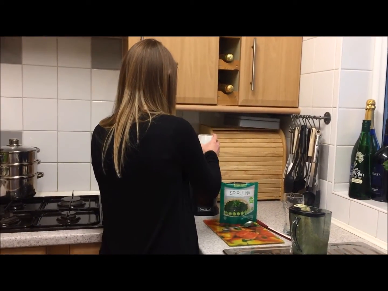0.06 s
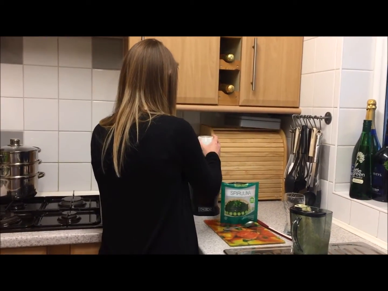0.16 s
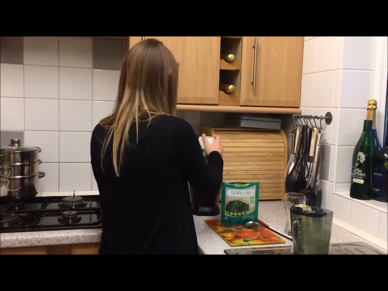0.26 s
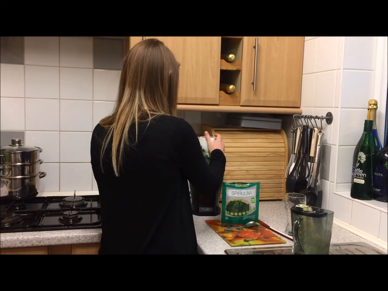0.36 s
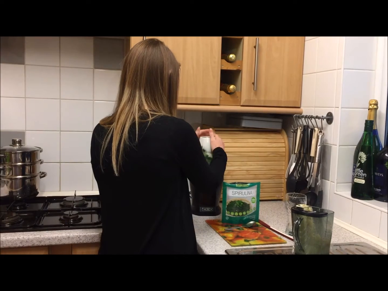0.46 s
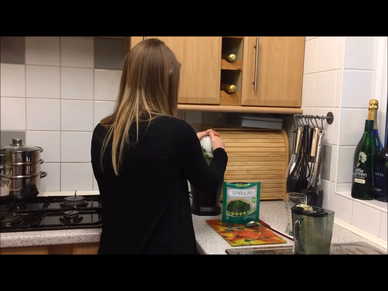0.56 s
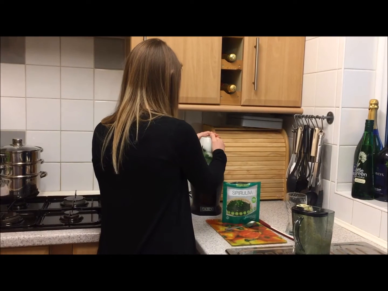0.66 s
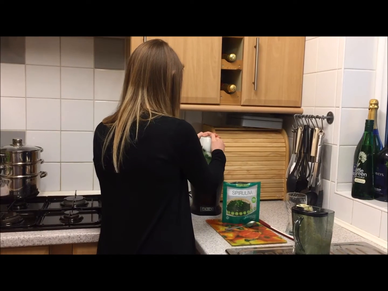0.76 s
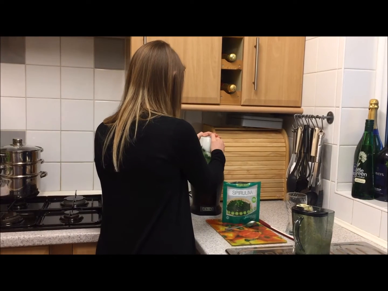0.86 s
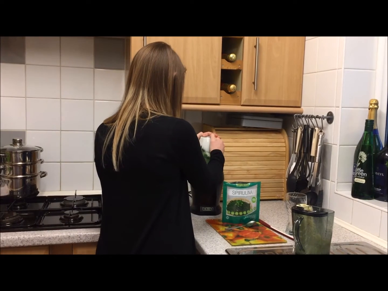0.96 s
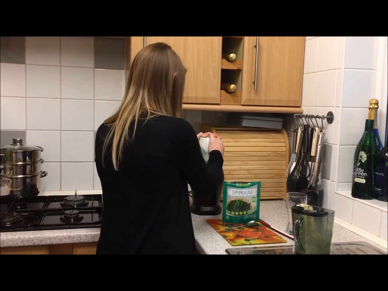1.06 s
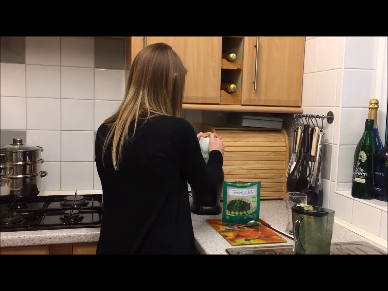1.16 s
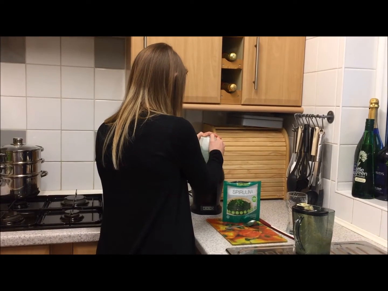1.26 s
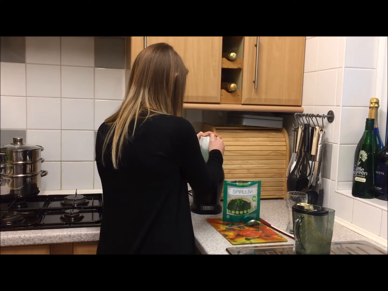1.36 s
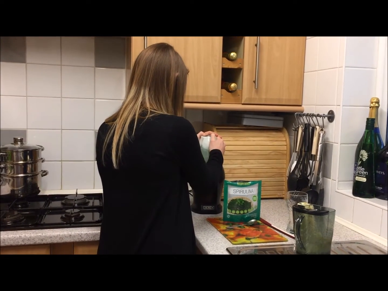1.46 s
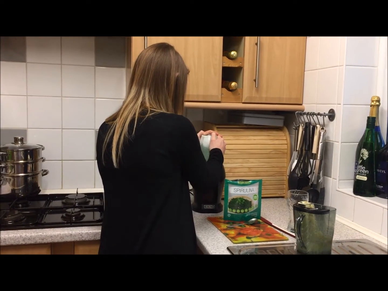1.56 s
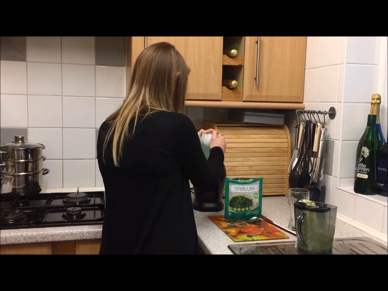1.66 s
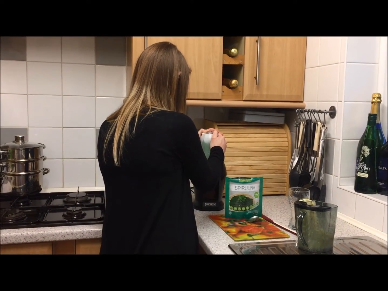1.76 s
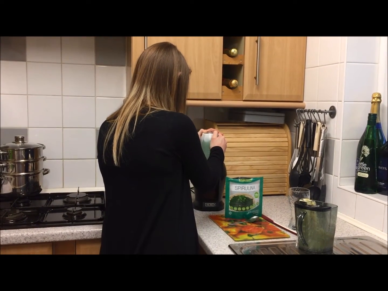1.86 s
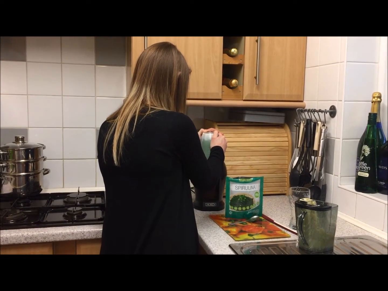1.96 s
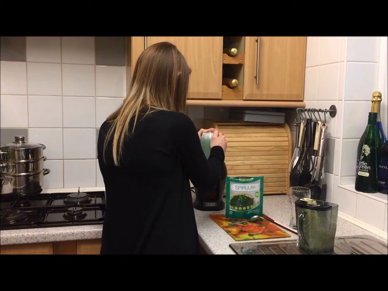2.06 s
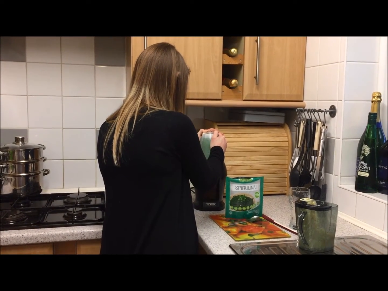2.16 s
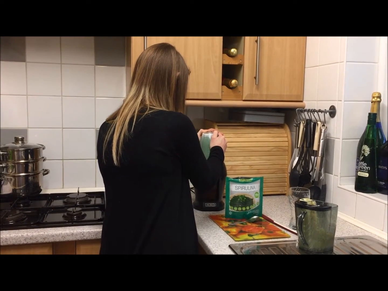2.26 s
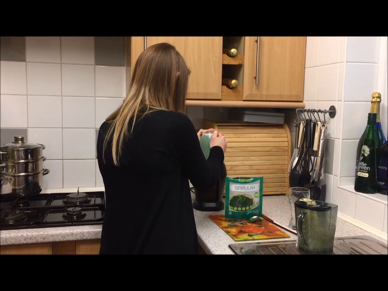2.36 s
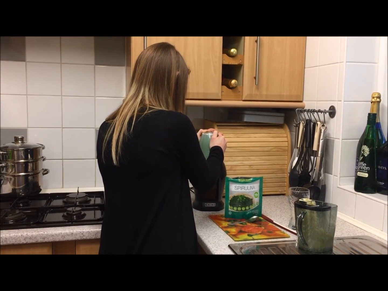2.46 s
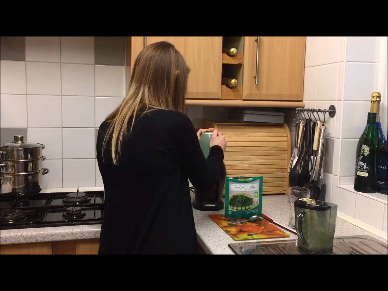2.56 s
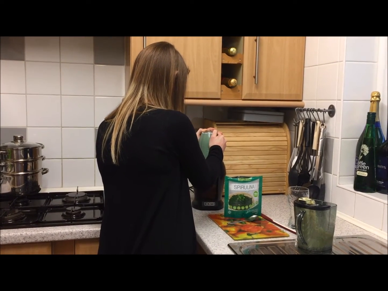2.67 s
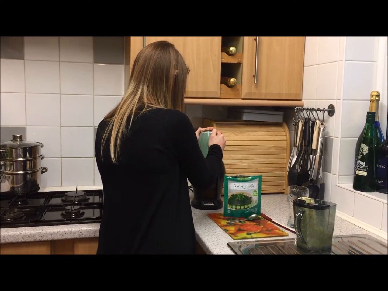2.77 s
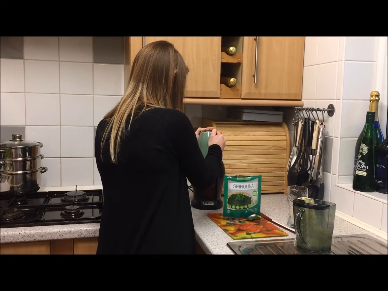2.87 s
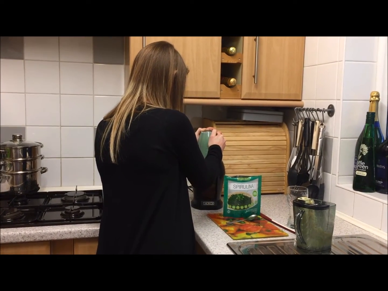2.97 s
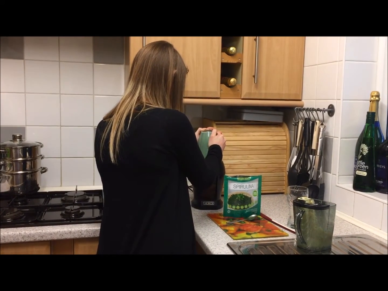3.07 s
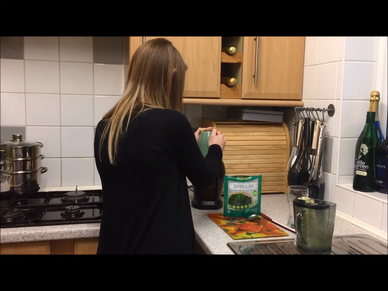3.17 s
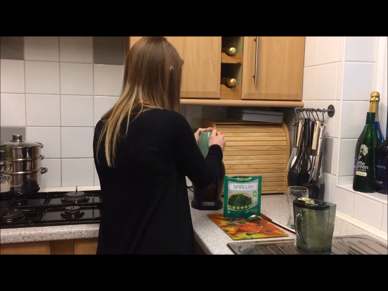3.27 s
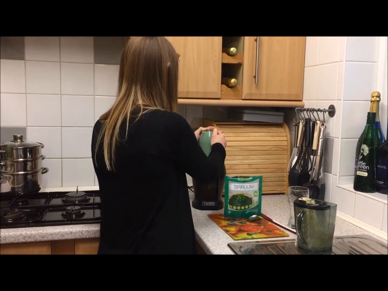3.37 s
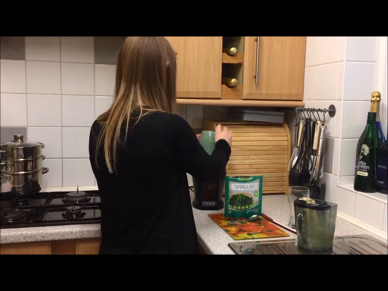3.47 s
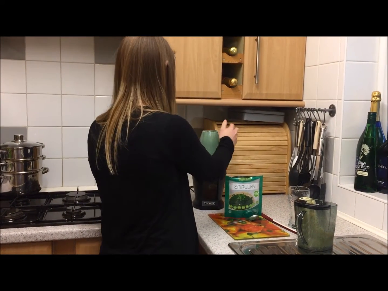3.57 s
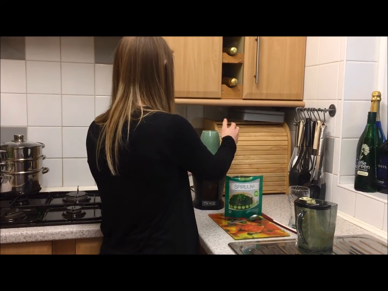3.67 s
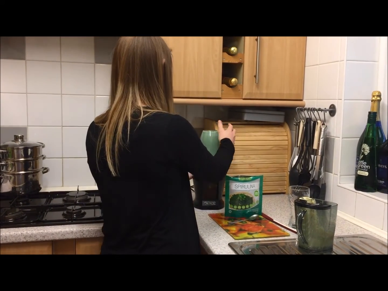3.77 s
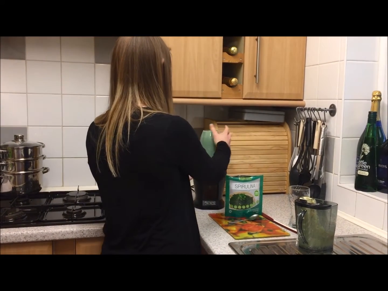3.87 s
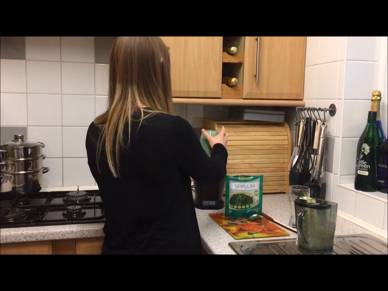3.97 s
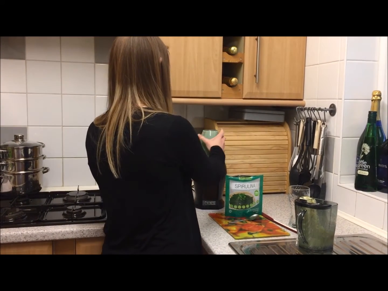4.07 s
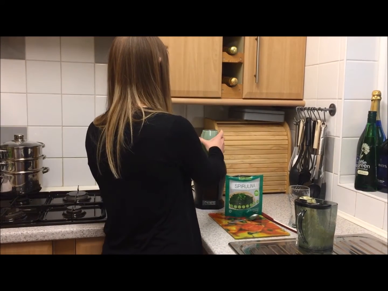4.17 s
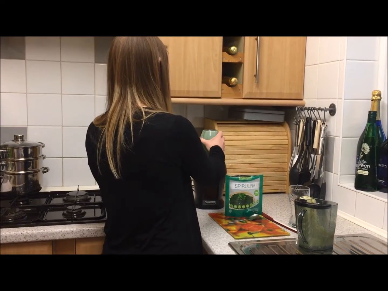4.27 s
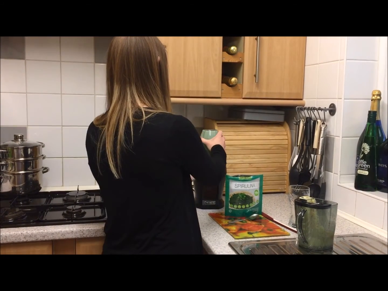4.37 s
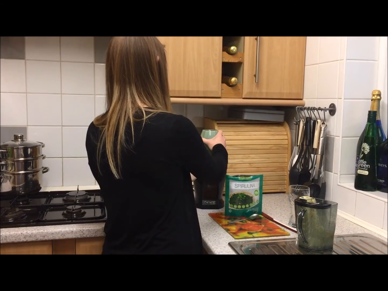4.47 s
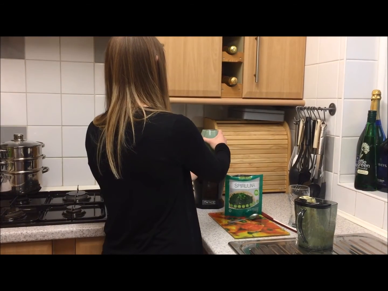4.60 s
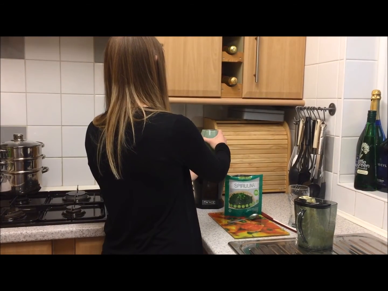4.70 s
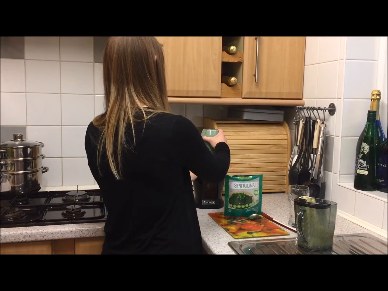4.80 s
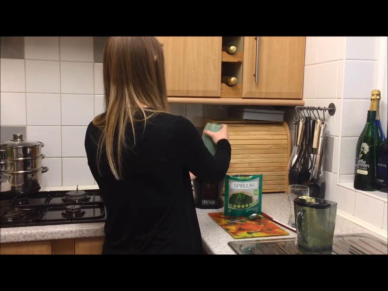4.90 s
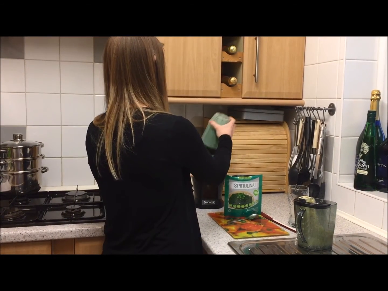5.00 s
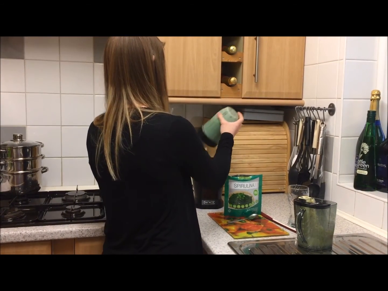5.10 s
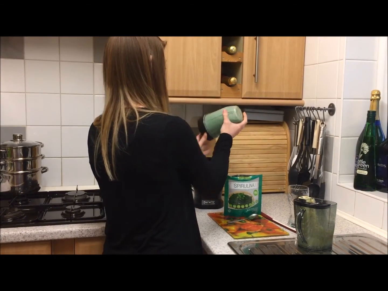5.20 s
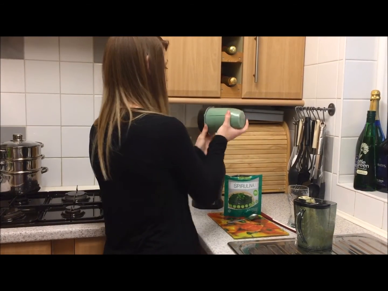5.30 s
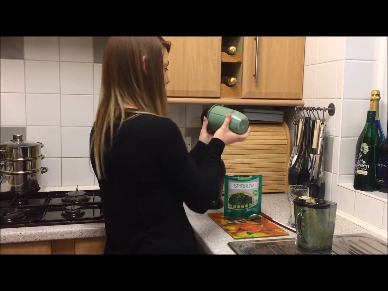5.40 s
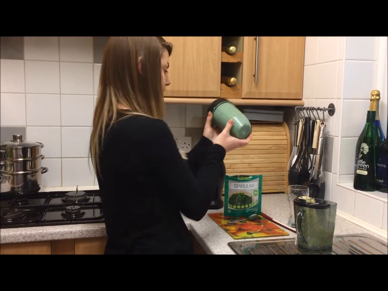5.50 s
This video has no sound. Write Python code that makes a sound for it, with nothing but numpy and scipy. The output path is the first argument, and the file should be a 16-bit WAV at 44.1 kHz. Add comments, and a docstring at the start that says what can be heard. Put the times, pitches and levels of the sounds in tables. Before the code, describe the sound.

In a tiled kitchen, a plastic cup knocks a few times onto a small blender base. With sharp clacks the motor starts, humming and churning liquid, then jumps to a high, hissing whine for about two seconds. It coasts down, the cup gives a faint squeak, and a hollow clack unlocks it, followed by light taps. The microphone stands some way back, so the room rings briefly.

```python
"""Personal blender in a tiled kitchen

One microphone, far enough back that the tiles outweigh the direct knocks. Over still air and appliance
hum the cup knocks onto its base, the motor hums and the blade churns liquid; it coasts down, and the cup
squeaks and is unlocked. The middle of the run passes four times too fast and too high, so the hum whines.
Cue times are as heard; decays, rates and frequencies are the kitchen's own unless marked as heard."""
import sys
import numpy as np
from scipy import signal
from scipy.fft import rfft, irfft, next_fast_len
from scipy.io import wavfile

SR = 44100
rng = np.random.default_rng(int(sys.argv[2]) if len(sys.argv) > 2 else 0)


def dump_mix(stems):
    """Bounce the given channels to the path in sys.argv[1] as a 16-bit WAV at rate SR."""
    frames = np.atleast_2d(stems).T  # one column per channel
    limited = np.clip(frames, -1, 1)  # hard clip at full scale
    pcm = np.round(limited * 32767).astype(np.int16)
    wavfile.write(sys.argv[1], SR, pcm)


N = 244342

FAST_FROM_S, FAST_TO_S, FAST = 1.57, 3.467, 4
ON_S, OFF_S = 1.107, 3.3334  # the motor's switch
DRAG_S = .2  # time constant of dragging the liquid up to speed
KITCHEN_N = N + round((FAST - 1) * (FAST_TO_S - FAST_FROM_S) * SR) + FAST  # samples before speeding up
CLOCK = np.arange(KITCHEN_N) / SR
FFT_N = next_fast_len(KITCHEN_N, True)
HZ = np.fft.rfftfreq(FFT_N, 1 / SR)

# A low boom near 56 Hz, then resonances of cup and base. Each row: centre in Hz, width in Hz, lift in dB.
PEAKS = [(56, 11, 11), (145, 53, 7.3), (276, 18, 15.5), (386, 17, 7.8), (548, 28, 6.2), (639, 59, 5.7),
         (741, 20, 6.7), (1016, 15, 2.4), (1102, 23, 6.9), (1207, 25, 6), (1288, 100, 7.3), (1340, 19, 7.3),
         (1610, 100, 6.5), (1730, 200, 3.2), (1850, 25, 6.9), (1950, 47, 6.2), (2141, 41, 9.9),
         (3144, 27, 8.9), (3775, 50, 8)]


def kitchen_time(s):
    """Seconds in the kitchen for a time as heard."""
    return s + (FAST - 1) * (np.clip(s, FAST_FROM_S, FAST_TO_S) - FAST_FROM_S)


def since(s, t):
    """Kitchen seconds gone by at t since the cue s; zero before it."""
    return np.maximum(t - kitchen_time(s), 0)


def amp(db):
    """Decibels to gain."""
    return 10 ** (np.asarray(db) / 20)


def unit_rms(x):
    """Scales to an rms of one."""
    return x / np.sqrt(np.mean(x ** 2) + 1e-20)


def curve(points, hz):
    """Joins (Hz, value) points on a log-frequency axis."""
    f, value = np.transpose(points)
    return np.interp(np.log(hz + 1), np.log(f + 1), value)


def lift(resonances, hz):
    """The gain of a set of resonances, in dB."""
    return sum(db / (1 + (2 * (hz - centre) / width) ** 2) for centre, width, db in resonances)


def follow(rows, t):
    """The columns of a cue table at kitchen times t."""
    s, *columns = np.transpose(rows)
    return [np.interp(t, kitchen_time(s), column) for column in columns]


def drift(t, per_s):
    """A random wander of about unit size, with per_s new values a second."""
    return np.interp(t * per_s, np.arange(12 * per_s), rng.standard_normal(12 * per_s))


def add(mix, start, sound):
    """Mixes a sound in at a kitchen time."""
    part = mix[max(round(start * SR), 0):][:len(sound)]
    part += sound[:len(part)]


def tiled_room(x, direct):
    """The direct sound and a dense tail off the tiles, each band dying at its own speed."""
    # The room's ring. Each row: frequency in Hz, seconds to fall 60 dB.
    ring_times = [(150, .38), (500, .32), (1100, .31), (2400, .32), (4000, .29), (6000, .28), (10000, .27),
                  (16000, .25)]
    hz, t, noise = signal.stft(rng.standard_normal(SR // 2), SR, nperseg=256)
    response = signal.istft(noise * amp(-60 * t / curve(ring_times, hz)[:, None]), SR, nperseg=256)[1]
    response /= np.linalg.norm(response)
    response[0] += direct
    return signal.fftconvolve(x, response)


def coloured_noise(colour):
    """Noise of unit rms, shaped by (Hz, dB) points."""
    spectrum = rfft(rng.standard_normal(FFT_N)) * amp(curve(colour, HZ))
    return unit_rms(irfft(spectrum)[:KITCHEN_N])


def room_tone(air_db=-67.5, waver_db=1.5):
    """Still air, wavering slightly in level, and the steady hum of appliances."""
    # The air's colour. Each row: frequency in Hz, relative level in dB.
    air_colour = [(25, -28.5), (66, -6.5), (113, -22), (173, -11.5), (240, -21), (330, -20), (460, -30.5),
                  (770, -23.5), (1000, -27), (1700, -28.5), (3000, -36), (5000, -41), (9000, -45.5),
                  (15500, -48)]
    # Appliance tones. Each row: frequency in Hz, level in dB.
    hum_tones = [(59.2, -76), (183, -79), (280, -80.5), (786, -75.5), (931, -86)]
    air = coloured_noise(air_colour) * amp(air_db - waver_db * drift(CLOCK, per_s=8))
    hum = sum(amp(db) * np.sin(2 * np.pi * (hz * CLOCK + rng.random())) for hz, db in hum_tones)
    return air + np.sqrt(2) * hum


def touch(s, clack_db, thud_db, tilt_db, contact_s, hollow, base_t60=.42, cup_t60=.13, rise_s=.0047):
    """A contact rings plastic and room over a low worktop thud: short ones knock, long ones rustle."""
    # The plastic's colour. Each row: frequency in Hz, relative level in dB.
    plastic_colour = [(30, -25), (100, -5), (250, -6), (450, -6.5), (800, -2.5), (1300, -1.5), (2000, -5),
                      (3400, -5.5), (4500, -9.5), (6000, -12), (9000, -20), (12000, -22), (15500, -24)]
    # The hollow cup ringing. Each row: frequency in Hz, lift in dB when fully hollow.
    hollow_colour = [(450, -1), (680, 5), (1300, 2), (1800, 12), (2600, 13), (3500, 9), (5000, 3.5),
                     (10000, 4)]
    # Modes of the base on the worktop. Each row: frequency in Hz, relative level in dB.
    worktop_modes = [(175, -10.5), (278, 4), (322, -1.5), (378, -5.5)]
    t = np.arange(SR * 3 // 5) / SR
    hz = np.fft.rfftfreq(len(t), 1 / SR)
    contact = rng.standard_normal(len(t)) * (t / contact_s) * np.exp(-2 * t / contact_s)
    spectrum = rfft(tiled_room(contact, direct=.11)[:len(t)])
    colour_db = curve(plastic_colour, hz) + .57 * lift(PEAKS, hz) + hollow * curve(hollow_colour, hz)
    colour_db += tilt_db * np.log2(np.maximum(hz, 400) / 2500)
    clack = irfft(spectrum * amp(colour_db), len(t))
    bass_db = curve([(30, -31.5), (65, -20), (110, -14.5), (180, 6), (340, 1), (520, -23.5),
                     (1200, -40), (4000, -79.5)], hz)
    bass_db += hollow * curve([(80, -14.5), (150, -1)], hz)  # the light cup has little deep bass
    boom = irfft(spectrum * amp(bass_db), len(t))
    ring = sum(amp(db) * np.sin(2 * np.pi * (f * t + rng.random())) for f, db in worktop_modes)
    t60 = np.interp(hollow, [0, 1], [base_t60, cup_t60])  # shorter when the cup takes the blow
    thud = ring * -np.expm1(-t / rise_s) * amp(-60 * t / t60)
    parts = ((clack, clack_db), (thud, thud_db), (boom, thud_db - 2))
    sound = sum(amp(db) * part / np.std(part[:SR // 25]) for part, db in parts)  # levels of first 40 ms
    fade_out = np.clip(3 - 4 * t / t[-1], 0, 1)
    return kitchen_time(s), sound * fade_out


def cabinet_rumble(rest_db=-81, rise_s=.026, fall_s=.039):
    """The cabinets are leaned on, or jolted as the motor starts and stops."""
    # Shoves that swell, hold and die away. Each row: start in seconds, hold in seconds, level in dB.
    shoves = [(.08, .27, -47), (.8, .04, -64.5), (1.19, .3, -52), (3.47, .47, -56.5), (5.098, .06, -63.5)]
    gain = amp(rest_db)
    for s, hold_s, db in shoves:
        swell = np.minimum(CLOCK - kitchen_time(s), 0) / rise_s
        gain += amp(db) * np.exp(swell - since(s + hold_s, CLOCK) / fall_s)
    return gain * coloured_noise([(20, -36), (52, -1.5), (80, 2.5), (110, -25.5), (300, -68)])


def shaft_speed(t, leap_s=.04, drag_share=.6, coast_s=.62, friction=.1):
    """Turns a second: the rotor leaps, drags the liquid up to speed, and coasts to rest."""
    # The whine at full power, sagging as the load grows. Each row: time in seconds, pitch as heard in Hz.
    whine = [(1.95, 1008), (2.324, 993.6), (2.484, 981), (2.824, 964.3), (3.252, 961.7), (3.31, 952.4)]
    on, off = since(ON_S, t), since(OFF_S, t)
    run_up = 1 - (1 - drag_share) * np.exp(-on / leap_s) - drag_share * np.exp(-on / DRAG_S)
    coast = (1 + friction) * np.exp(-off / coast_s) - friction  # liquid drag and dry friction
    return follow(whine, t)[0] / FAST * np.maximum(run_up * coast, 0)


def motor(shaft_db=-38, db_per_octave=15, growl_db=-32, flutter_db=3, ripple_hz=100, full_load_sag=.05):
    """Shaft orders, the twelve-bar commutator, and sidebands from the mains pulsing the torque."""
    # Motor tones. Each row: multiple of the shaft speed, sideband of the torque ripple,
    # relative level in dB, change under full load in dB.
    partials = [(2, 0, -45, -3.5), (3, 0, -39.5, -2), (4, 0, -45.5, 1), (5, 0, -44, -2), (6, 0, -50, 1.5),
                (8, 0, -41.5, 3.5), (9, 0, -48.5, 2), (12, 0, -35, -1.5), (13, 0, -43.5, 6),
                (15, 0, -45, -0.5), (1, 1, -45.5, -1.5), (2, -1, -42.5, 1.5), (2, 1, -41, -3),
                (3, 1, -54.5, 11), (4, 1, -46, -2.5), (5, 1, -44.5, 2), (7, 1, -49, 1.5)]
    # Housing resonances that the hum passes. Each row: centre in Hz, width in Hz, lift in dB.
    housing_modes = [(152, 14, 11), (175, 24, 11), (243, 12, 11.05)]
    t = CLOCK[shaft_speed(CLOCK) > 1]
    speed = shaft_speed(t)
    pace = speed / speed.max()
    turns = np.cumsum(speed * (1 + .001 * drift(t, per_s=20))) / SR  # lumps load the blade unevenly
    turns += .0027 * drift(t, per_s=250)  # play in the coupling roughens the highest tones
    hum_db = shaft_db + db_per_octave * np.log2(pace) + lift(housing_modes, speed)
    hum_db -= 4 * (t > kitchen_time(OFF_S))  # softer once unpowered
    hum = amp(hum_db + drift(t, per_s=16)) * np.sin(2 * np.pi * turns)
    strain = np.clip(np.gradient(speed) * SR / 130, -.5, 1) * pace ** 2  # while the speed changes
    growl = amp(growl_db + flutter_db * drift(t, per_s=30)) * strain * np.sin(4 * np.pi * turns)
    load = np.clip((1 - pace) / full_load_sag, 0, 1)
    tones = 0
    for order, sideband, db, loaded_db in partials:
        cycles = order * turns + sideband * ripple_hz * t
        tones += amp(db + loaded_db * load + flutter_db * drift(t, per_s=9)) * np.sin(2 * np.pi * cycles)
    tones *= amp(1.5) * pace ** 6.8  # upper tones fade as the shaft slows
    return t[0], np.sqrt(2) * (hum + growl + tones)


def swirl_levels(t, churn_db=-29.5, bite_s=.02, gulp_at_s=1.266, gulp_s=.044, gulp_db=10.5):
    """The liquid's level, and its hiss and slosh relative to that, in dB: bite, gulp, rush, settling."""
    on, off = since(ON_S, t), since(OFF_S, t)
    bite_db = 20 * np.log10(np.clip(on / bite_s, 1e-6, 1))
    build_db = -4 * np.exp(-on / DRAG_S)
    settle_db = -22.5 * off ** 3.4  # after switch-off the swirl collapses ever faster
    hiss_db = 3.5 + 11.5 * np.expm1(-(off / .28) ** 2)  # fades as the blade stops tearing the liquid
    gulp = np.exp(-((t - gulp_at_s) / gulp_s) ** 2)  # the blade swallows the liquid
    slosh_db = 2 + gulp_db * gulp + 7.5 * off  # mostly slosh is left at the end
    return churn_db + bite_db + build_db + settle_db, hiss_db, slosh_db


def churning(chops_per_s=220, chop_size=17.5, swirl_depth=.39, heard_lull_s=.018):
    """The blade whips liquid and chops pieces, a tick each; cup, base and a low boom colour the rush."""
    # The rush's broad colour. Each row: frequency in Hz, relative level in dB.
    rush_colour = [(25, -34), (50, -17), (110, -22), (170, -5.5), (450, -4.5), (900, -2.5), (2000, -2.5),
                   (3850, -1.5), (4400, -6.5), (5200, -7), (6300, -5.5), (8500, -11), (11000, -12),
                   (15000, -12.5)]
    # Moments when the rush thins briefly. Each row: time in seconds, depth in dB.
    lulls = [(1.655, 6), (1.70, 5), (1.745, 6), (1.85, 4), (1.955, 4), (2.32, 4), (2.362, 5), (2.533, 4),
             (2.575, 4), (2.692, 12), (3.045, 3), (3.222, 12)]
    level_db, hiss_db, slosh_db = swirl_levels(CLOCK)
    turns = np.cumsum(shaft_speed(CLOCK)) / SR
    chops = chop_size * rng.choice([-1, 1], KITCHEN_N) * (rng.random(KITCHEN_N) < chops_per_s / SR)
    rush = rng.standard_normal(KITCHEN_N) * (1 + swirl_depth * np.sin(2 * np.pi * turns))
    rush += tiled_room(chops, direct=.4)[:KITCHEN_N]
    colour = amp(curve(rush_colour, HZ) + lift(PEAKS, HZ))
    colour /= np.sqrt(np.mean(colour ** 2 * ((HZ > 520) & (HZ < 2100))))  # the midrange sets the level
    spectrum = rfft(unit_rms(rush), FFT_N) * colour
    low = curve([(420, .64), (540, .0071)], HZ)
    high = curve([(1450, .1), (2450, 1)], HZ)
    top = curve([(3800, .12), (10000, .94)], HZ)
    bands = (low, 1 - low - high, high * (1 - top), high * top)
    slosh, body, hiss, spray = (irfft(spectrum * band, FFT_N)[:KITCHEN_N] for band in bands)
    spray_db = 2.6 * np.minimum(hiss_db - 2, 0)  # fine spray dies faster than the hiss as the blade slows
    liquid = amp(slosh_db) * slosh + body + amp(hiss_db) * hiss + amp(spray_db) * spray
    dip = np.minimum(1.3 * signal.windows.hann(round(2 * FAST * heard_lull_s * SR)), 1)
    for s, depth_db in lulls:
        add(level_db, kitchen_time(s - heard_lull_s), -depth_db * dip)
    return liquid * amp(level_db)


def fast_forward(x):
    """The middle stretch runs by faster, and its pitch rises with it."""
    start, end = round(FAST_FROM_S * SR), round(kitchen_time(FAST_TO_S) * SR)
    return np.concatenate([x[:start], signal.resample_poly(x[start:end], 1, FAST), x[end:]])[:N]


def squeak(roughness=.099):
    """The cup sticks and slips in a short falling tone."""
    # The squeak's glide. Each row: time in seconds, pitch in Hz, level in dB before the room.
    glide = [(4.203, 4850, -85), (4.215, 4720, -70), (4.228, 3740, -60), (4.245, 3260, -61),
             (4.265, 3100, -90.5)]
    t = np.arange(kitchen_time(glide[0][0]), kitchen_time(glide[-1][0]), 1 / SR)
    hz, db = follow(glide, t)
    cycles = np.cumsum(hz * (1 + roughness * drift(t, per_s=900))) / SR
    return t[0], tiled_room(amp(db) * np.sin(2 * np.pi * cycles), direct=1)


def scene():
    """Everything reaches one microphone, the same in both channels."""
    # Knocks of the cup and its catches, and soft handling rustles. Each row: start in seconds, clack
    # in dB, thud in dB, brightness in dB per octave, contact length in seconds, hollowness from 0 to 1.
    touches = [(0.002, -69.5, -55, 3, 0.0021, 0.15), (0.069, -41, -44.5, -1, 0.0042, 0.2),
               (0.188, -44.5, -41, 0.5, 0.0097, .1), (0.197, -40, -35, -3, 0.0062, 0),
               (0.292, -43.5, -39, -.5, 0.0074, 0.44), (0.303, -40, -35.5, -6, 0.0094, 0.25),
               (0.342, -65, -49, -14, .0067, 0.2), (0.57, -76, -63, -11, 0.042, 0.1),
               (0.933, -70.5, -70, -4.5, .013, 0.5), (1.106, -24, -55, 4.5, 0.01, 0.9),
               (1.138, -24.5, -62, -1.5, 0.004, 0.1), (1.208, -27, -34.5, 4.5, 0.008, 0),
               (4.625, -63.5, -77.5, -2, .023, 1), (4.655, -25, -50.5, 1, 0.006, 1),
               (4.674, -44.5, -38, 1, 0.01, 0.74), (4.944, -61.5, -62.5, -7, 0.012, 0),
               (4.969, -65, -59.5, -1, 0.0064, 0), (5.002, -53, -80, 0, 0.01, 0.75),
               (5.04, -52.5, -57, 3, 0.0089, .16), (5.33, -79, -85.5, -1, 0.13, 0.2)]
    mix = room_tone() + cabinet_rumble() + churning()
    add(mix, *motor())
    add(mix, *squeak())
    for row in touches:
        add(mix, *touch(*row))
    return np.tile(fast_forward(mix), (2, 1))


def record(dry, edge_hz=15850):
    """The microphone's band ends steeply in the top treble."""
    lowpass = signal.firwin(511, edge_hz, window=("kaiser", 9), fs=SR)
    return signal.oaconvolve(dry, lowpass[None], "same")


dry = scene()
out = record(dry)
dump_mix(out)
```